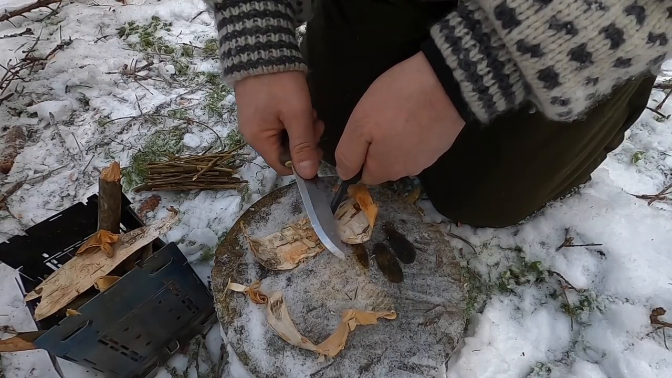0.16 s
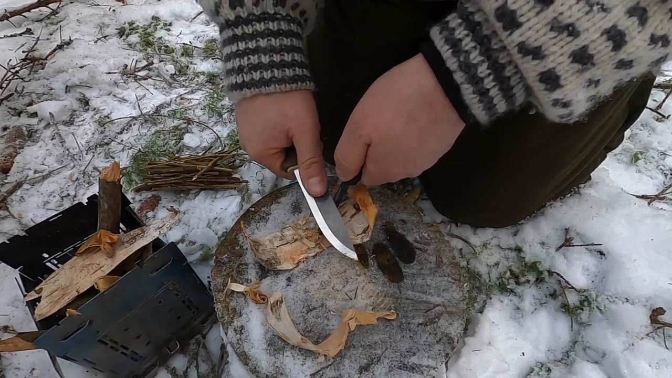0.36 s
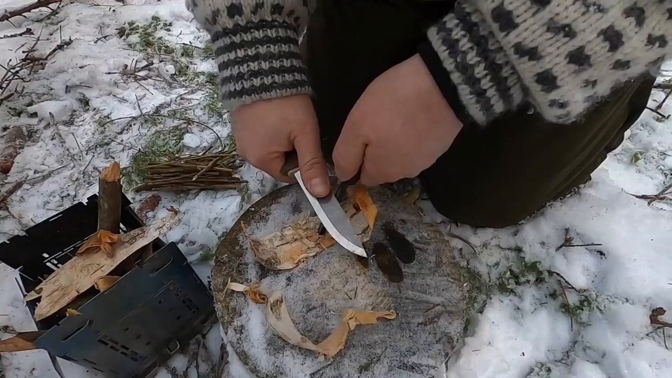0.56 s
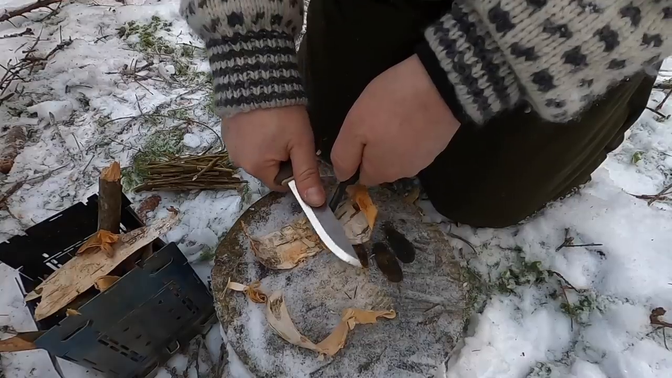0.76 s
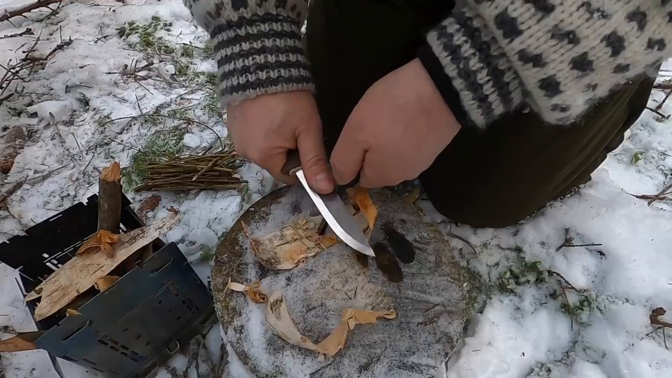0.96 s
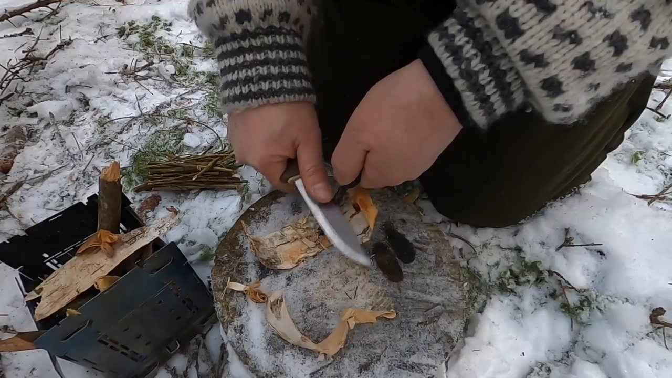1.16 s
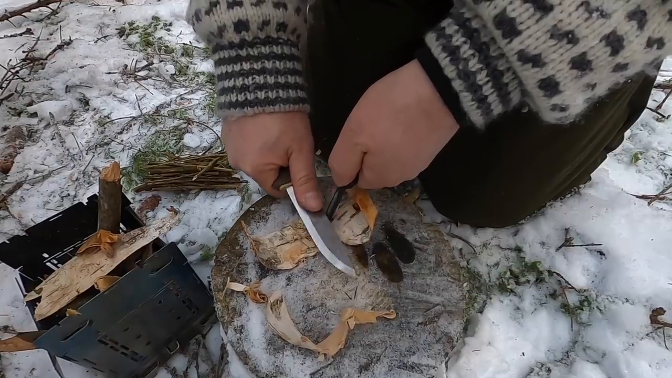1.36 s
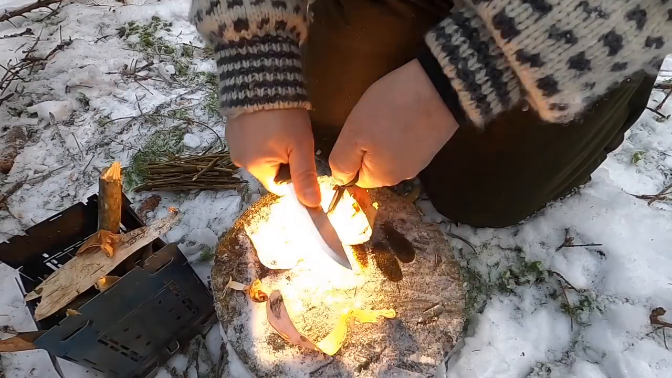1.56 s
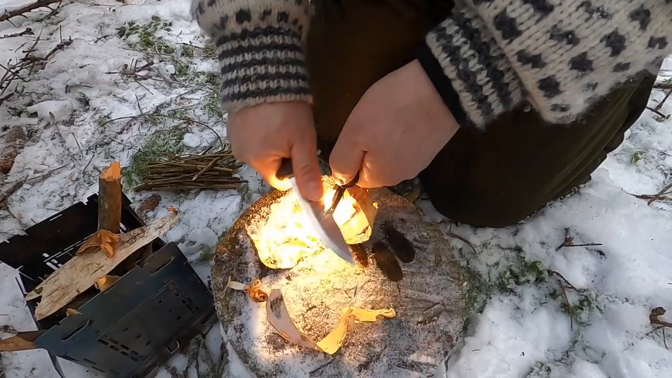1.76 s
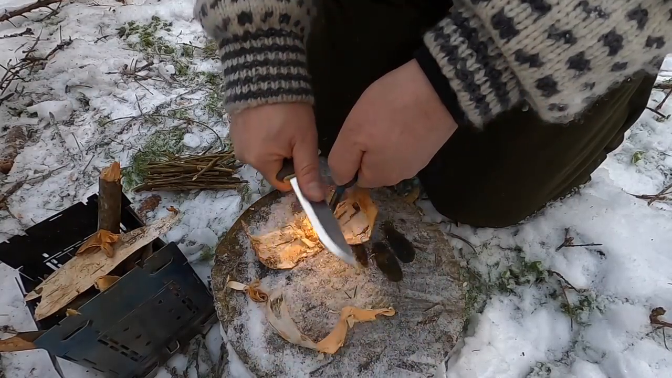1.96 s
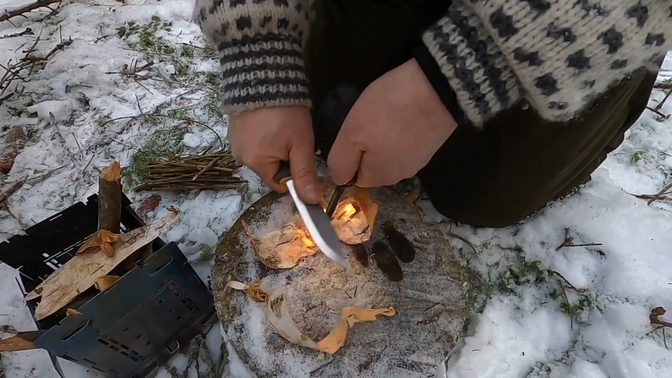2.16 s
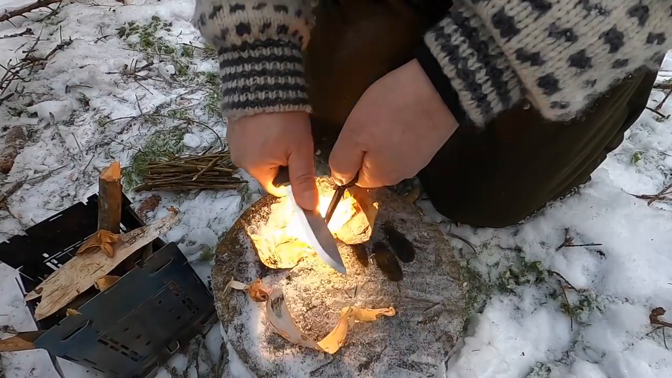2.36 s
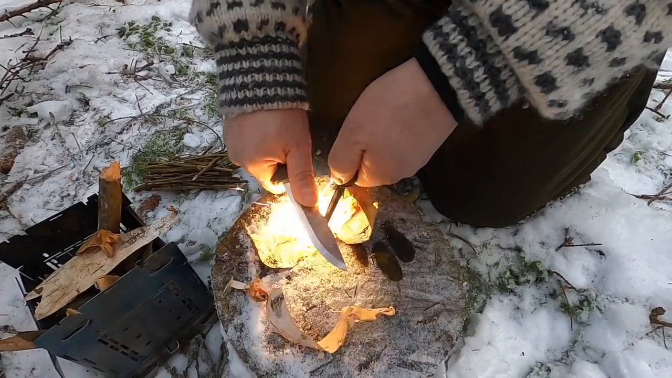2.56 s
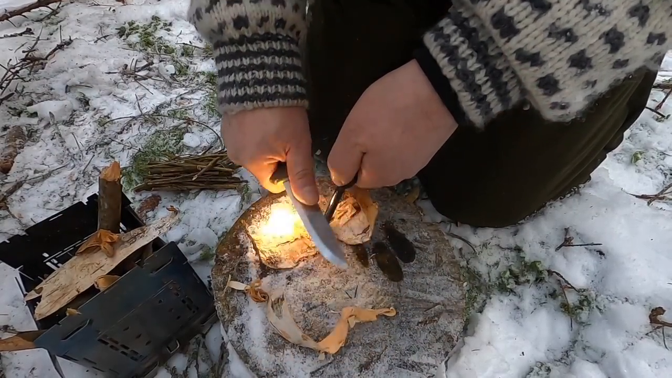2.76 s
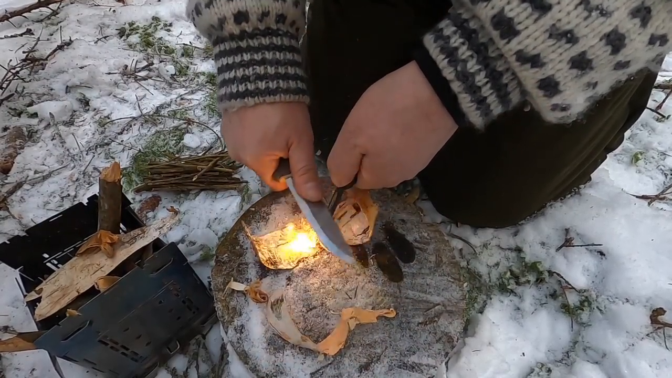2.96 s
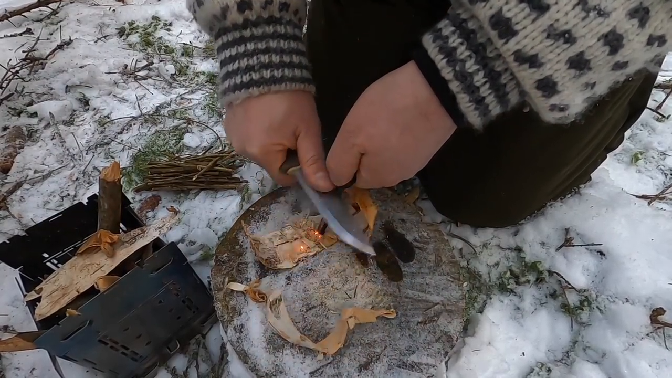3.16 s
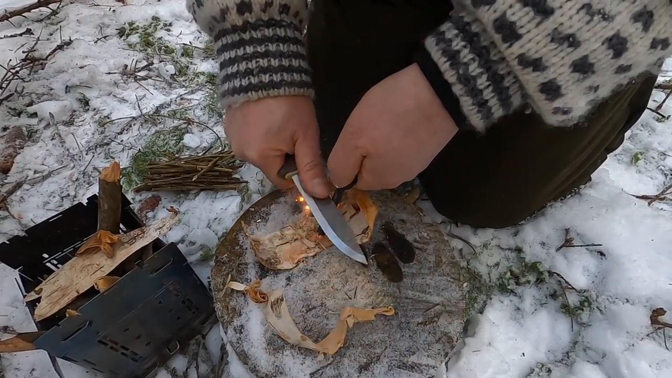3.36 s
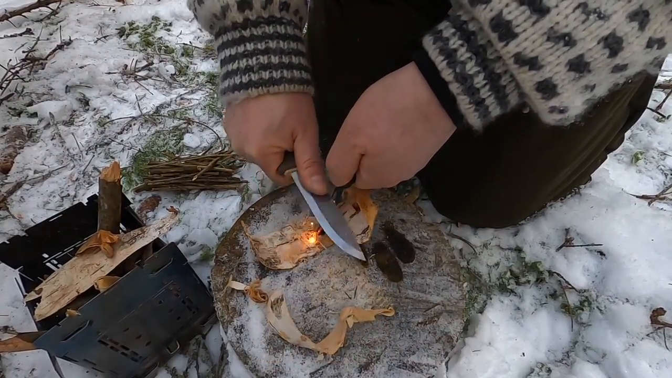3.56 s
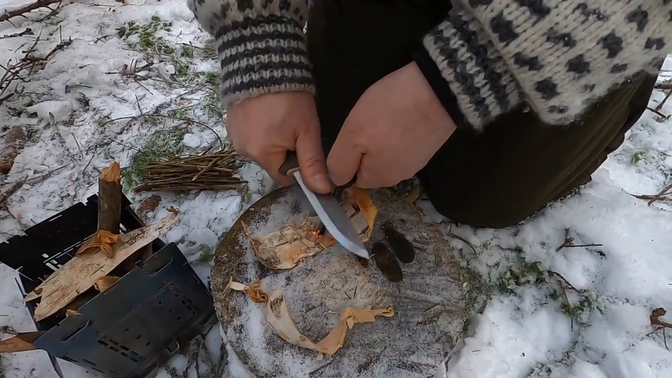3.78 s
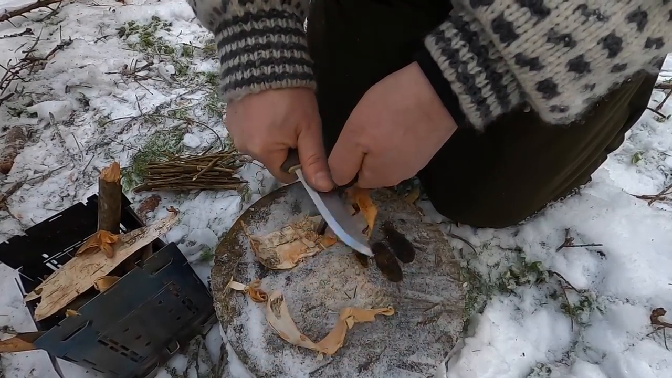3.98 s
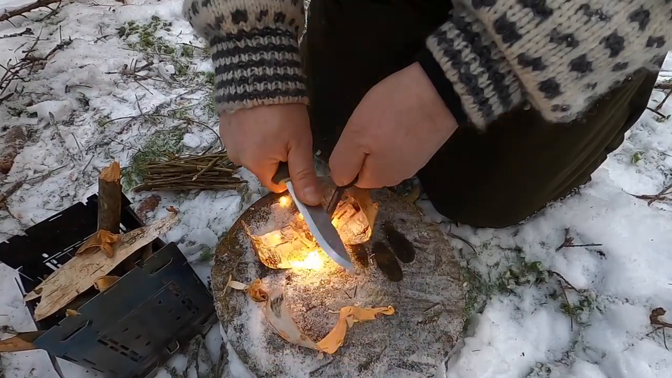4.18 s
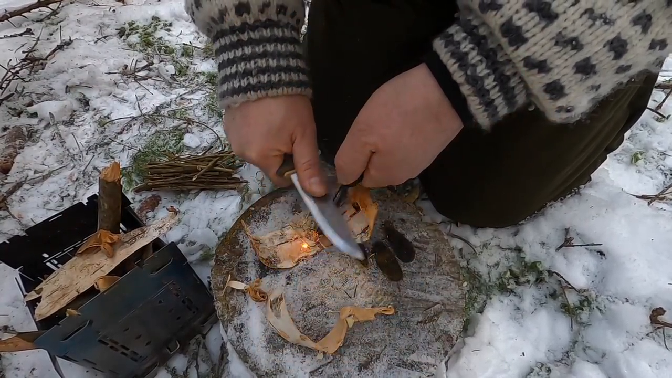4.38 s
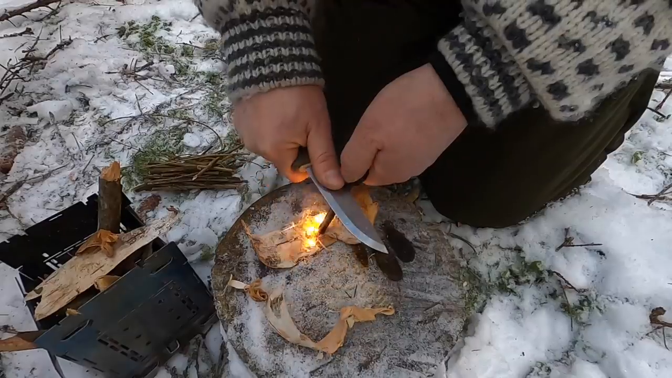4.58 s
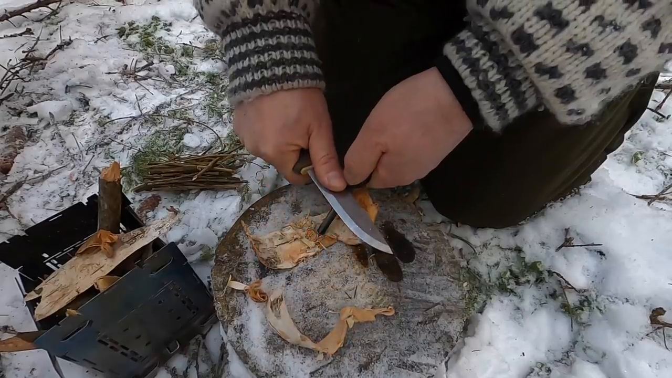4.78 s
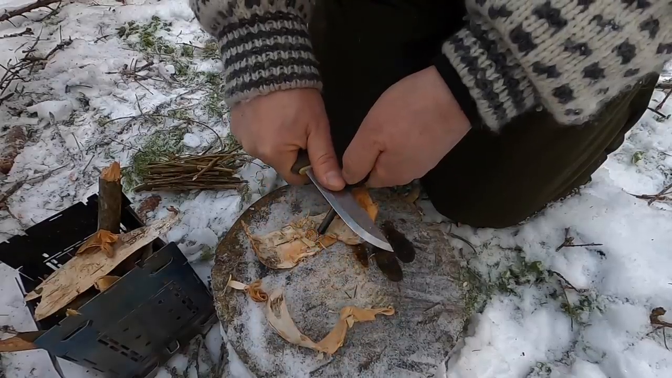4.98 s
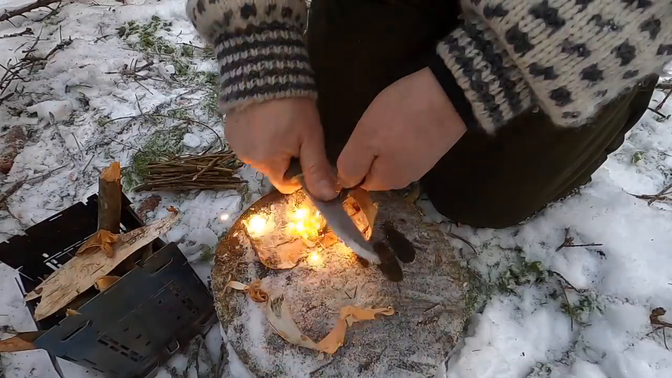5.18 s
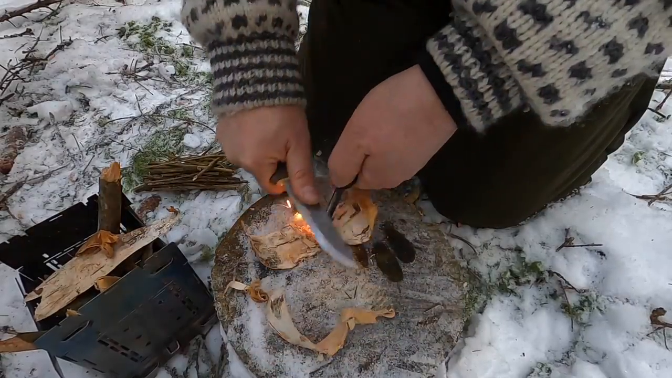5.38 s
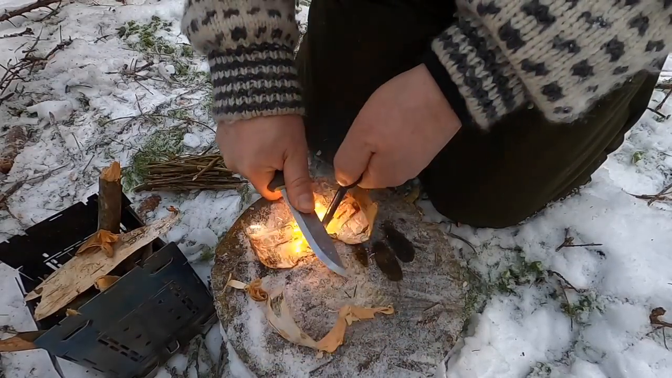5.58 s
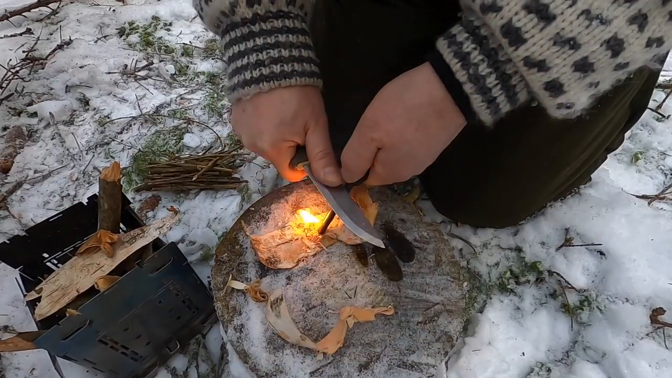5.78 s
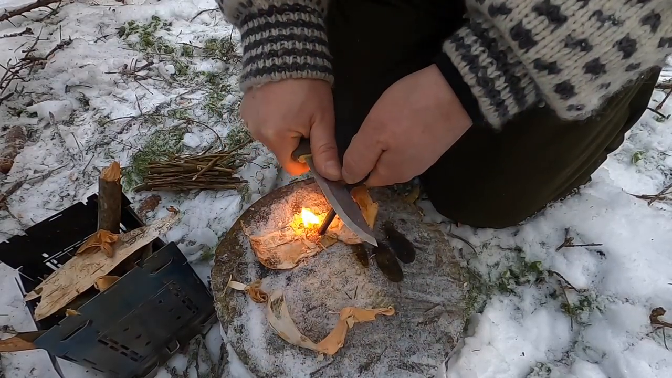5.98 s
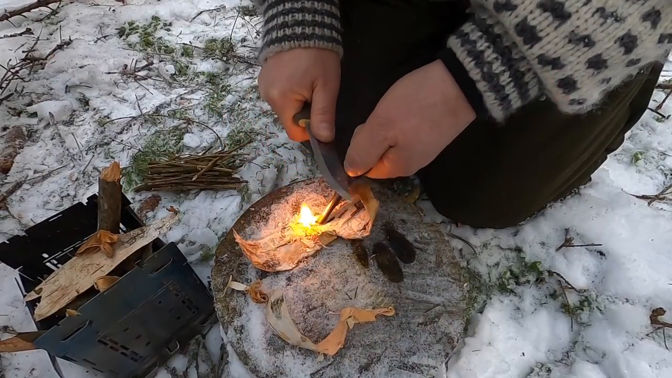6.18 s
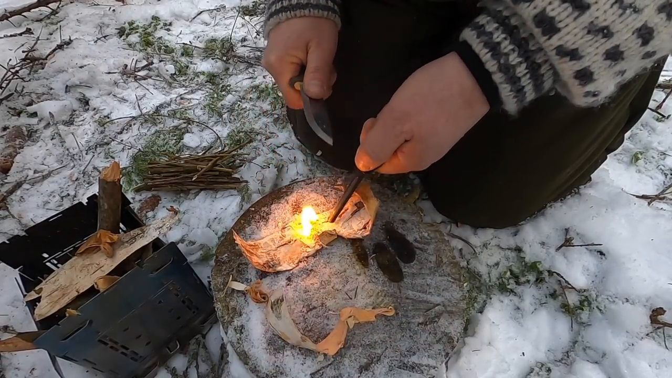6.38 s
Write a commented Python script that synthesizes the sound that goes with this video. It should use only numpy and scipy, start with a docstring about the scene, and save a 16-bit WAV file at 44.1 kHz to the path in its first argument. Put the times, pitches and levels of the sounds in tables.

```python
"""Quiet snowy woods, a tree stump close to the microphone, faint air in the distance.
A knife spine is rasped to and fro along a fire-steel rod over the stump. Hard pushes tear grit off the
rod and thrum the stump; lighter pulls chatter and make the blade sing. The blade brushes the rod at
first, taps and snags on it here and there, and at the end the bark tinder rustles."""
import sys
import numpy as np
from scipy import signal
from scipy.fft import rfft, irfft, next_fast_len
from scipy.io import wavfile
from scipy.ndimage import uniform_filter1d, minimum_filter1d, map_coordinates

SR = 44100
rng = np.random.default_rng(int(sys.argv[2]) if len(sys.argv) > 2 else 0)


def digitize_waveform(pressure):
    """Quantize a signal to 16-bit integers and store it at the path in sys.argv[1].

    Rows of a 2-D input are taken as channels; values are limited to [-1, 1].
    """
    field = np.atleast_2d(pressure).T
    bounded = np.clip(field, -1, 1)
    quanta = np.round(bounded * 32767).astype(np.int16)
    wavfile.write(sys.argv[1], SR, quanta)


N = 283694

# torn grit as the microphone hears it: (frequency [Hz], gain [dB])
GRIT_COLOUR = [(300, -30.5), (1000, -11.5), (2000, 0.5), (4500, -5.5), (6000, -7.5), (8000, -20),
               (10000, -17.5), (13000, -30.5), (15500, -59)]
# rod and stump under pressure: (frequency [Hz], gain [dB])
THRUM_COLOUR = [(40, -38), (100, -18.5), (230, -6), (350, -11), (500, -4), (800, -1.5), (1300, 1),
                (2000, -4), (4000, -46)]


def amp(db):
    """Gain of a level in dB."""
    return 10 ** (np.asarray(db) / 20)


def unit(x):
    """x at rms 1."""
    return x / np.sqrt(np.mean(x ** 2) + 1e-20)


def colour(f, points):
    """Gain through (frequency [Hz], gain [dB]) points on a log axis."""
    hz, db = np.transpose(points)
    return amp(np.interp(np.log(f + 1), np.log(hz + 1), db))


def causal(f, points):
    """The minimum-phase response with that colour."""
    cepstrum = irfft(np.log(colour(f, points)))
    cepstrum[1:len(cepstrum) // 2] *= 2
    cepstrum[len(cepstrum) // 2 + 1:] = 0
    return np.exp(rfft(cepstrum))


def below(f, hz):
    """A steep causal low-pass."""
    return 1 / (1 + 1.414j * f / hz - (f / hz) ** 2) ** 2


def above(f, hz):
    """The matching high-pass."""
    return below(f, hz) * (f / hz) ** 4


def resonance(f, hz, width_hz):
    """One mode, gain 1 at its centre."""
    return 1j * f * width_hz / (hz * hz - f * f + 1j * f * width_hz)


def filtered(x, response):
    """x times a complex response of frequency."""
    size = 2 * next_fast_len(N // 2 + SR // 4)
    return irfft(rfft(x, size) * response(np.fft.rfftfreq(size, 1 / SR)), size)[..., :N]


def played(source, gain, response):
    """A source through a body, scaled so that gain sets its rms."""
    return filtered(source * gain, response) / np.std(filtered(source, response))


def wobble(rate):
    """A smooth random curve, rate knots a second."""
    knots = rng.standard_normal(int(N * rate / SR) + 4)
    return map_coordinates(knots, [np.arange(N) * rate / SR])


def envelope(curves):
    """Gain along curves of (time [s], level [dB]), silent between them."""
    t = np.arange(N) / SR
    gain = sum(amp(np.interp(t, *np.transpose(curve), left=-120, right=-120)) for curve in curves)
    return uniform_filter1d(gain, size=90)


def stroke_gain(strokes, attack_s, release_s, arch_db):
    """The edge grips, holds over one arched crest, lets go and trails along the rod."""
    grip_db, let_go_db, trail_db, trail_s = 20, 25.5, 10.5, 0.032
    curves = []
    for start, length, db, swell_db, crest, *_ in strokes:
        held, end = start + attack_s, start + length
        freed = end - min(release_s, .3 * length)
        crest = np.clip(crest, .05, .95)
        top = (held + crest * (freed - held), db - swell_db * (1 - crest) + arch_db)
        curves.append([(start, db - swell_db - grip_db), (held, db - swell_db), top, (freed, db),
                       (end, db - let_go_db), (end + trail_s, db - let_go_db - trail_db)])
    return envelope(curves)


def slide(strokes, first, last):
    """A value that slides from first to last along each stroke."""
    start, length = np.transpose(strokes)[:2]
    times = np.maximum.accumulate(np.column_stack([start, start + length]).ravel())
    values = np.column_stack([np.full(len(strokes), first), np.full(len(strokes), last)])
    return np.interp(np.arange(N) / SR, times, values.ravel())


def grit(rate, spread_db, hiss, clump_db, patchy_db):
    """Tiny breaks of unequal size over a fine hiss, in clumps; each moment favours other bands."""
    sizes = amp(spread_db * np.minimum(rng.exponential(size=N), 3))
    breaks = (rng.random(N) < rate / SR) * rng.standard_normal(N) * sizes
    bands = signal.stft(unit(breaks) + hiss * rng.standard_normal(N), nperseg=128)[2]
    patches = uniform_filter1d(rng.standard_normal(bands.shape), size=3, axis=0)
    patches = unit(uniform_filter1d(patches, size=4, axis=1))
    patchy = signal.istft(bands * amp(patchy_db * patches), nperseg=128)[1][:N]
    return unit(patchy * amp(clump_db * wobble(160)))


def knife(f):
    """The modes of blade and rod stand on the broad sound of the contact."""
    # steel modes: (frequency [Hz], width [Hz], lift [dB])
    modes = [(1050, 233, 7), (1726, 170, 4.5), (2527, 170, 7.5), (3130, 280, 3), (3954, 270, 7),
             (4640, 770, 8.5), (6580, 660, 11), (9220, 260, 6)]
    return 1 + sum((amp(db) - 1) * resonance(f, hz, width) for hz, width, db in modes)


def gritty_steel(f):
    """The colour of torn grit through the steel's modes."""
    return knife(f) * causal(f, GRIT_COLOUR)


def stump(f):
    """The low colour of rod and stump through the steel's modes."""
    return knife(f) * causal(f, THRUM_COLOUR)


def free_rod(force, centre_hz, quality, lift_db):
    """The free length of rod changes along the stroke: its resonance glides across a bank of modes."""
    bank_hz = np.geomspace(1600, 5000, 13)
    place = np.interp(np.log(centre_hz), np.log(bank_hz), np.arange(len(bank_hz)))
    rings = np.zeros(N)
    for k, hz in enumerate(bank_hz):
        share = np.clip(1 - abs(place - k), 0, 1)
        rings += filtered(force * share, lambda f: resonance(f, hz, hz / quality))
    return force + amp(lift_db) * rings


def woods():
    """The bed of the place: far air that drifts a little, and a soft low hum that swells early on."""
    # spectrum of the far air: (frequency [Hz], density [dB])
    air_colour = [(25, -40), (65, -8), (112, -14), (190, -5), (400, -12), (1000, -7.5), (1800, -7),
                  (3500, -15.5), (6000, -25), (9000, -36.5), (12000, -37.5), (15000, -61)]
    # drift of the air: (time [s], level [dB])
    air_levels = [(0, -53), (.7, -55.5), (4.45, -53.5), (4.73, -50.5), (4.9, -58.5), (5.85, -50.5),
                  (6.0, -60.5), (6.3, -55.5), (6.43, -52)]
    # swell of the hum: (time [s], level [dB])
    hum_levels = [(0.134, -80), (0.184, -64.5), (0.378, -47), (0.72, -64.5)]
    air = unit(filtered(rng.standard_normal(N), lambda f: colour(f, air_colour)))
    hum = unit(filtered(rng.standard_normal(N), lambda f: resonance(f, 328, 130) ** 2))
    air_gain = envelope([air_levels]) * amp(.8 * wobble(28))
    hum_gain = envelope([hum_levels]) * amp(3.3 * wobble(16.4))
    return air_gain * air + hum_gain * hum


def tinder():
    """Dry curls of bark give thin papery grains."""
    # bark rustling as it catches, one curve a rustle: (time [s], level [dB])
    rustles = [
        [(6.1, -104), (6.12, -61.5), (6.198, -42), (6.25, -65)],
        [(6.29, -66), (6.328, -46.5), (6.36, -68)],
    ]
    grains = grit(rate=1650, spread_db=6.5, hiss=.6, clump_db=4.5, patchy_db=-2.5)
    return played(grains, envelope(rustles),
                  lambda f: resonance(f, 3660, 1300) ** 2 * below(f, 6000) + amp(-31) * below(f, 5000))


def brushes():
    """The blade slides lightly over the rod: soft, dull grit."""
    # one curve a touch: (time [s], relative level [dB])
    touches = [
        [(0.002, -34), (0.028, -35), (0.037, -44.5), (0.07, -30), (0.095, -37.5), (0.148, -41), (0.2, -64)],
        [(0.24, -58), (0.35, -50.5), (0.355, -60)],
        [(0.38, -50), (0.512, -35.5), (0.548, -35), (0.562, -50), (0.6, -59)],
    ]
    force = grit(rate=8400, spread_db=3.5, hiss=0.33, clump_db=1.5, patchy_db=1.5)
    soft = lambda f: gritty_steel(f) * (below(f, 2400) * above(f, 1200) + amp(-22) * below(f, 9300))
    return amp(0.6) * played(force, envelope(touches), soft)


def snaps():
    """Single dry clicks in the treble, probably sparks bursting."""
    # clicks: (time [s], relative level [dB])
    clicks = [(1.3523, -42.5), (1.6077, -37), (1.6462, -26), (1.8871, -30), (2.2603, -35), (2.837, -24),
              (3.1837, -20), (3.7294, -43), (3.9155, -38), (4.2194, -42), (4.2494, -38), (4.348, -30),
              (5.1472, -43), (5.4271, -20)]
    impulses = np.zeros(N)
    for start, db in clicks:
        impulses[round(start * SR)] = amp(db)
    return amp(13) * filtered(impulses, lambda f: above(f, 5000) * below(f, 11000))


def taps():
    """A short blow clinks the steel's modes, with a thud from the stump and a crack from the edge."""
    # taps and hard snags on the rod: (time [s], relative level [dB], thud trim [dB], crack trim [dB])
    hits = [(0.3621, -2, -24.5, -54), (1.9754, -8.5, -28, -30), (2.3495, -4, -29, -32),
            (2.5407, -2.5, -32, -35), (2.6237, -12, -5.5, -36), (3.0815, -6, -36, -32),
            (3.25, -11.5, -29, -37), (3.2957, -3, -40, -39), (4.0572, -25, -40, -28),
            (4.0678, 12, -35, -36), (4.42, -26.5, -9, -26), (4.7066, -18, -0.5, -19),
            (4.7727, -35.5, -3, -9.5), (5.1758, -22.5, -9, -7), (5.1934, -9.5, 4, -15),
            (5.8739, -20.5, -3.5, -11.5), (5.8912, -34, -13, -17), (6.154, -32.5, -2, -24)]
    layers, t = np.zeros((3, N + SR)), np.arange(1200) / SR
    for start, db, thud_db, crack_db in hits:
        burst = rng.standard_normal(len(t)) * amp(-60 * t / .006)
        burst *= 5.4 / np.linalg.norm(burst)
        gains = amp([[db + 9.5], [db + thud_db + 12], [db + crack_db + 18]])
        layers[:, round(start * SR):][:, :len(t)] += gains * burst
    blows, thuds, cracks = layers[:, :N]
    clink_band = lambda f: above(f, 1800) * below(f, 3030) * (0.46 + 1.2 * resonance(f, 2850, 400))
    clink = filtered(blows, lambda f: knife(f) * clink_band(f))
    crack = filtered(cracks, lambda f: gritty_steel(f) * above(f, 3950))
    thud = filtered(thuds, lambda f: causal(f, THRUM_COLOUR))
    return clink + crack + thud


def pulls():
    """The spine chatters back up the rod through a falling resonance; mid-stroke the blade sings."""
    # pulls: (start [s], length [s], level before release [dB], swell over the hold [dB],
    # crest [share of the hold], resonance at start [Hz], resonance at end [Hz])
    strokes = [(1.004, 0.081, -24, 13, 0.51, 2540, 2050), (1.256, 0.092, -24.5, 10.5, 0.39, 2870, 2080),
               (1.502, 0.095, -28.5, 6, 0.55, 2600, 2230), (1.735, 0.1, -21.5, 13.5, 0.65, 2800, 2300),
               (1.966, 0.075, -28, -6.5, 1, 2700, 2300), (2.139, 0.092, -23, 10.5, 0.73, 2700, 2300),
               (2.34, 0.081, -30.5, -9.5, 0.6, 3630, 2300), (2.52, 0.083, -22, 4.5, 0.89, 3600, 2300),
               (2.707, 0.071, -21.5, 8, 0.15, 4000, 2050), (2.888, 0.067, -30.5, -5, 0.099, 3900, 2140),
               (3.067, 0.066, -35.5, -10, 0.21, 3740, 2150), (3.23, 0.082, -16, 11.0, 0.097, 4500, 1840),
               (3.424, 0.085, -29.5, 3, 0.13, 3550, 2150), (3.621, 0.078, -25, 0, 0.15, 4250, 2120),
               (3.81, 0.083, -18.0, 11.5, 0.087, 4120, 2300), (4.006, 0.079, -17, 6.5, 0.23, 4860, 1840),
               (4.287, 0.12, -30.5, 10.5, 0.69, 2800, 2300), (4.567, 0.13, -26, 2.5, 1, 4020, 1760),
               (5.209, 0.15, -30.0, -2, 0.96, 3370, 2130), (5.477, 0.098, -28.0, -6, 0.81, 3600, 2300),
               (5.722, 0.11, -32.0, -6, 0.67, 3630, 2150)]
    *_, start_hz, end_hz = np.transpose(strokes)
    gain = stroke_gain(strokes, attack_s=0.0083, release_s=0.015, arch_db=8)
    way = slide(strokes, 0, 1)
    force = grit(rate=2500, spread_db=-0.5, hiss=0.63, clump_db=1.64, patchy_db=2.5)
    chatter = free_rod(force, slide(strokes, start_hz, end_hz), quality=5.5, lift_db=12.5)
    rasp = played(chatter, gain, lambda f: gritty_steel(f) * above(f, 870) * below(f, 4760))
    sing = played(force, gain * amp(-50 * (way - .62) ** 2), lambda f: resonance(f, 2517, 92))
    sizzle = played(force, gain * amp(-60 * (way - .52) ** 2),
                    lambda f: gritty_steel(f) * above(f, 6240) * below(f, 8370))
    thrum = played(force, gain ** 0.38, stump)
    return rasp + amp(-21.5) * sing + amp(-17) * sizzle + amp(-30) * thrum


def pushes():
    """Dense rasp whose resonance climbs; pressure thrums rod and stump, the biting edge rings high."""
    # pushes down the rod: (start [s], length [s], relative level before release [dB],
    # swell over the hold [dB], crest [share of the hold], thrum trim [dB], bite trim [dB])
    strokes = [(0.807, 0.12, -36, -2.5, 0.54, -6.0, 0), (1.108, 0.14, -33, -3, 0.85, -4, 0),
               (1.344, 0.15, -33.5, -8.0, 0.76, -6, 0), (1.595, 0.043, -27, 6.5, 0.15, -12, 2),
               (1.632, 0.14, -29.5, 0, 0.15, 2.5, 2), (1.845, 0.1, -20, 14, 0.45, -5, -4.5),
               (2.049, 0.14, -26, 6, 0.37, -3, 1), (2.247, 0.12, -31.0, -6, 0.62, -5, -4.5),
               (2.425, 0.118, -25, 2.5, 0.65, -6, -2), (2.614, 0.11, -27.5, -0.5, 0.73, -3.5, -3.5),
               (2.79, 0.091, -21.5, 11.5, 0.3, -7, -4.5), (2.962, 0.11, -29, 3, 0.64, -7, -8.5),
               (3.153, 0.11, -32.5, -8.5, 0.38, -2.5, -5.5), (3.321, 0.13, -30, -4.5, 0.38, -6, -4.5),
               (3.518, 0.11, -27, 3.5, 0.83, -3.5, -2.5), (3.711, 0.095, -20.5, 13.5, 0.11, -7, -4),
               (3.908, 0.099, -23.5, 5.5, 0.3, -5.5, 0), (4.094, 0.21, -39, -13, 0.37, -1.5, -5.5),
               (4.481, 0.13, -29.5, 3, 0.4, -2.5, -3), (5.135, 0.12, -25.5, 6.5, 0.75, -1.5, -2),
               (5.36, 0.12, -24.5, 2.5, 0.72, -4.5, -1), (5.59, 0.13, -23, 12.5, 0.75, -4.5, -2.5)]
    *_, thrum_db, edge_db = np.transpose(strokes)
    gain = stroke_gain(strokes, attack_s=0.01, release_s=0.029, arch_db=7)
    way = slide(strokes, 0, 1)
    force = grit(rate=5000, spread_db=2.5, hiss=0.88, clump_db=1.5, patchy_db=3)
    scrape = free_rod(force, slide(strokes, 2030, 5100), quality=9.5, lift_db=0.5)
    rasp = played(scrape, gain, lambda f: gritty_steel(f) * below(f, 5320))
    # the edge bites most a third of the way down; sparks fly most a little later
    bite_db = slide(strokes, edge_db, edge_db) - 14 * (1 - np.exp(-((way - .33) / 0.34) ** 2))
    ring = played(force, gain * amp(bite_db),
                  lambda f: gritty_steel(f) * above(f, 6520) * below(f, 7170))
    sparks = played(force, gain * amp(-40 * (way - .55) ** 2),
                    lambda f: gritty_steel(f) * above(f, 10600) * below(f, 9900))
    # pressure builds to the end of the push; the stump's deepest answer comes only under full pressure
    pressure_db = -21.5 * (0.71 * way - 0.72) ** 2
    thrum_gain = gain * amp(slide(strokes, thrum_db, thrum_db) + pressure_db)
    rumble = unit(0.62 * force + grit(rate=4000, spread_db=7.5, hiss=0.43, clump_db=-1, patchy_db=2))
    thrum = played(rumble, thrum_gain, stump)
    deep = played(rumble, thrum_gain * amp(2.6 * pressure_db), lambda f: above(f, 50) * below(f, 190))
    return amp(-1.54) * rasp + amp(-3.26) * ring + amp(-15) * sparks + amp(2.5) * thrum + amp(-25) * deep


def scene():
    """Snow swallows most echoes: only a faint dull scatter follows the steel."""
    # left-right difference, nearly mono with a faint wide hiss in the top treble:
    # (frequency [Hz], side gain [dB])
    side_colour = [(40, -24.5), (100, -23.5), (500, -32.5), (1500, -63), (3000, -51.5), (6000, -32.5),
                   (9000, -28.5), (13000, -0.5)]
    close = pushes() + pulls() + brushes() + taps() + snaps() + tinder()
    t = np.arange(SR // 8) / SR
    echo_s, spread_s = .12, .03
    tails = rng.standard_normal((2, len(t))) * amp(-60 * t / np.array([[echo_s], [spread_s]]))
    tails /= np.linalg.norm(tails, axis=1)[:, None]
    echo, spread = signal.fftconvolve(close[None], tails, axes=1)[:, :N]
    mid = close + amp(-42) * filtered(echo, lambda f: 1 / (1 + 1j * f / 3000)) + woods()
    side = filtered(spread + amp(3.5) * woods(), lambda f: colour(f, side_colour))
    return np.array([mid + side, mid - side])


def record(dry):
    """A fast limiter holds the hardest snags down; nothing passes above the band limit."""
    ceiling, top_hz = .8, 15060
    needed = np.minimum(1, ceiling / (np.abs(dry).max(axis=0) + 1e-9))
    gain = uniform_filter1d(minimum_filter1d(needed, size=129), size=65)
    return filtered(dry * gain, lambda f: f < top_hz)


dry = scene()
out = record(dry)
digitize_waveform(out)
```